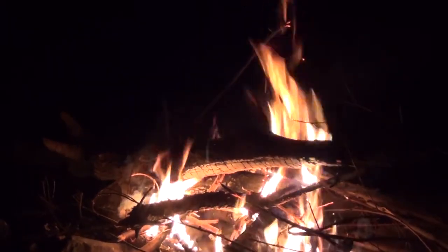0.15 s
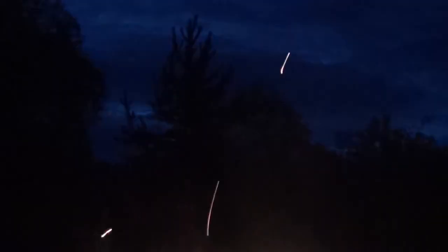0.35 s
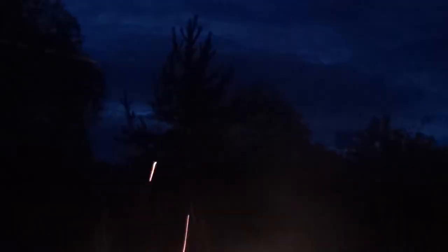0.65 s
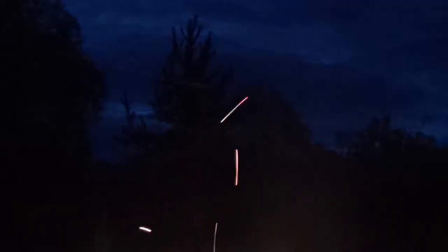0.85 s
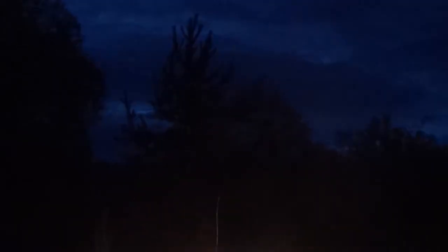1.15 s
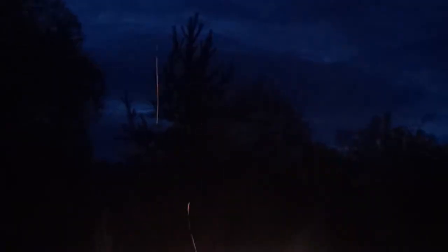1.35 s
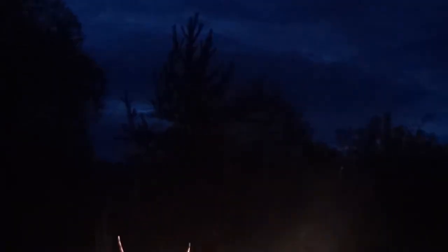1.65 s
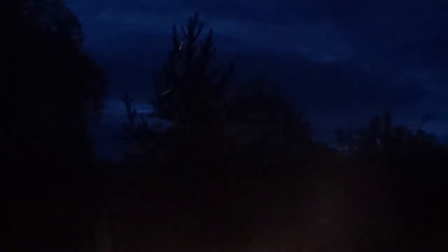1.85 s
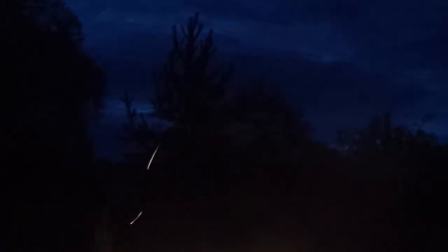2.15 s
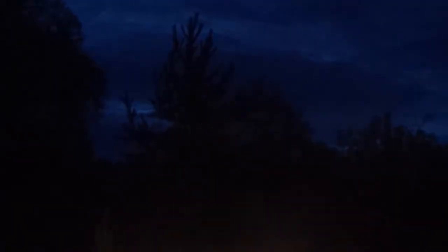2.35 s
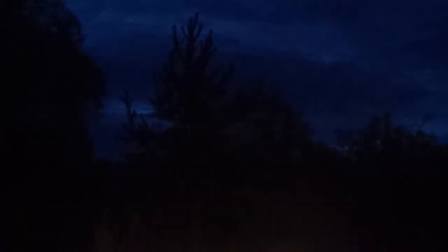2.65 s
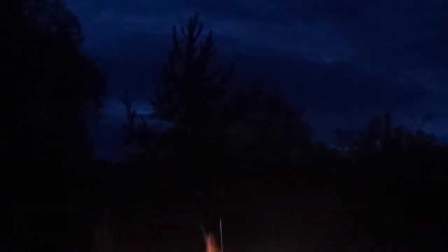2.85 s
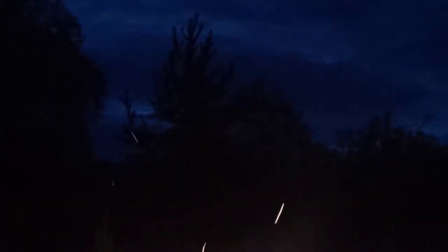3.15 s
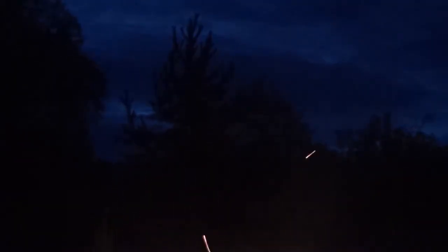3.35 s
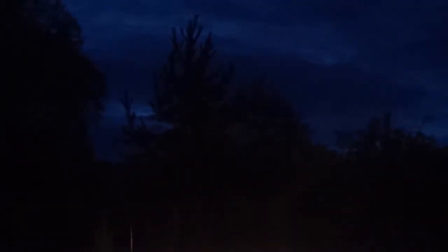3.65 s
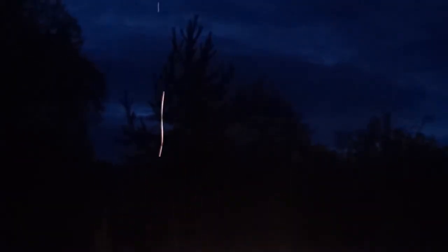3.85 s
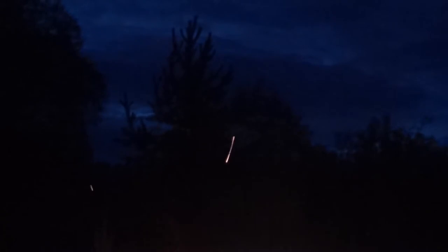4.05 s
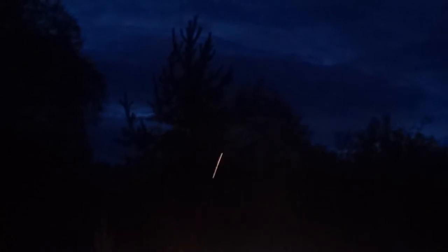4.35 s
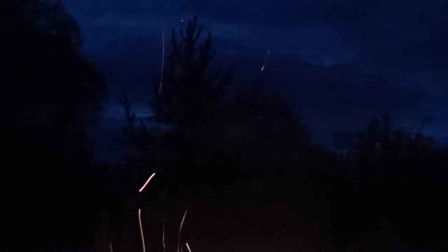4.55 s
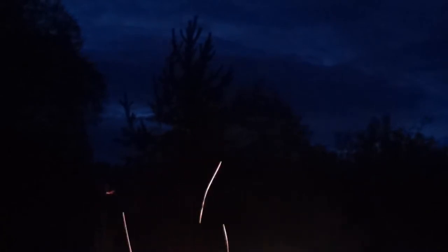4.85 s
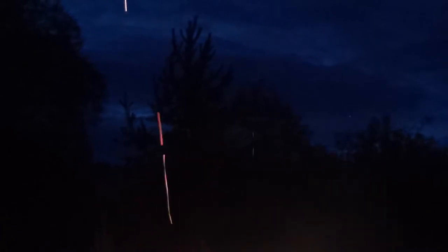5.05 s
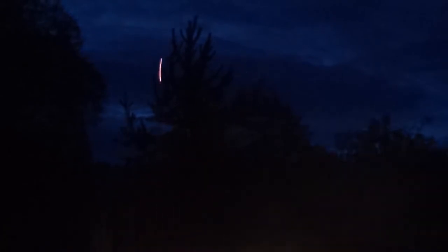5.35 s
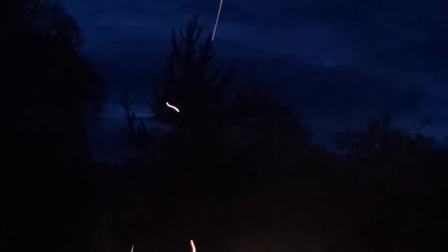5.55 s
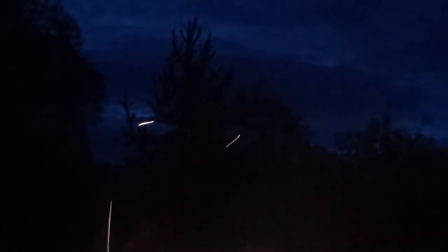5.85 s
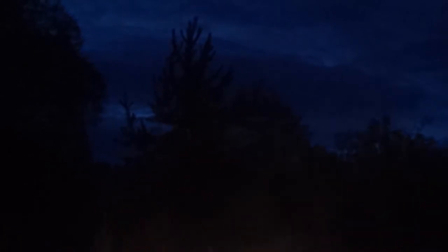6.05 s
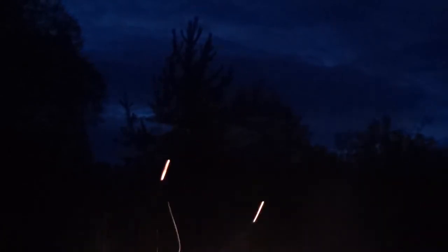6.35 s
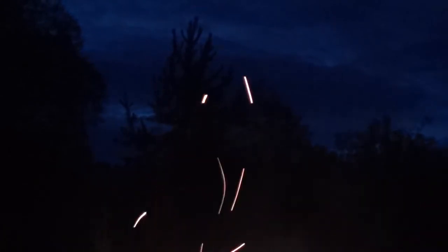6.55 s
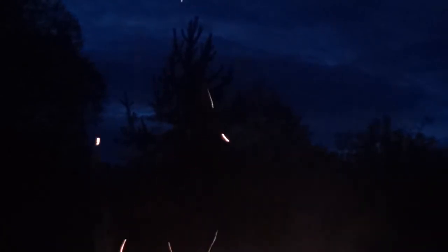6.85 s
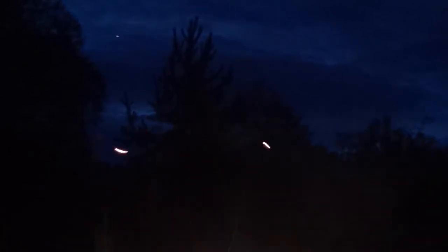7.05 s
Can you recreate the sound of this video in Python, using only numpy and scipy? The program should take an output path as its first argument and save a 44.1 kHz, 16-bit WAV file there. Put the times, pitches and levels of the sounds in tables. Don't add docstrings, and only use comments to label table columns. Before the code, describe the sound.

Outdoors at night, burning branches snap, tick and pop irregularly close by, one pop very loud, over a soft high insect trill.

```python
import sys
import numpy as np
from scipy import signal
from scipy.fft import rfft, irfft, next_fast_len
from scipy.io import wavfile
from scipy.ndimage import uniform_filter1d

SR = 44100
rng = np.random.default_rng(int(sys.argv[2]) if len(sys.argv) > 2 else 0)


def bounce(signal):
    frames = np.transpose(np.atleast_2d(signal))
    limited = np.clip(frames, -1, 1)
    pcm = np.round(limited * 32767).astype(np.int16)
    wavfile.write(sys.argv[1], SR, pcm)


def elevation(decibels):
    levels = np.asarray(decibels, float)
    return 10 ** (levels / 20)


N = 317079


def unit(x):
    return x / np.sqrt(np.mean(x ** 2))


def along(table, hz):
    f, v = np.transpose(table)
    return np.interp(np.log(np.maximum(hz, 1)), np.log(f), v)


def colour(x, table):
    size = next_fast_len(N)
    hz = np.fft.rfftfreq(size, 1 / SR)
    return irfft(rfft(x, size) * elevation(along(table, hz)), size)[..., :N]


def ring(x, modes):
    out = 0
    for hz, width, db in modes:
        b, a = signal.iirpeak(hz, hz / width, SR)
        once = signal.lfilter(b, a, x)
        out = out + elevation(db) * signal.lfilter(b, a, once)
    return out


def walk(rate):
    hold = int(SR / rate)
    steps = np.repeat(rng.standard_normal(N // hold + 1), hold)
    return 1.3 * uniform_filter1d(uniform_filter1d(steps, hold), hold)[:N]


def ticks(rate, scatter_db, most=3.4):
    chance = rng.random((3, N))
    size_db = scatter_db * np.minimum(-np.log(1 - chance[2]), most)
    return (chance[0] < rate / SR) * np.sign(chance[1] - .5) * elevation(size_db)


def pair(mid, other, wide_db, pan_db=0.):
    stereo = mid + elevation(wide_db) * np.array([other, -other])
    return stereo * elevation(np.array([[pan_db], [-pan_db]]) / 2)


def chorus():
    # frequency in Hz, level in dB per Hz.
    chorus_colour = [(4500, -48), (5600, -26.5), (7000, -1.5), (7800, 6), (9800, 2), (10800, -5.5),
                     (12500, -38), (16000, -31)]
    mid, other = unit(colour(rng.standard_normal((2, N)) * elevation(1.64 * walk(5.94)), chorus_colour))
    return elevation(-48.0) * pair(mid, other, -8.0)


def cricket(strokes, wing, sharp, teeth_hz, db, pan_db):
    turn = 2 * np.pi * strokes
    skewed = turn + 0.5 * (np.cos(turn) - 1) + 0.26
    push = np.exp(sharp * (np.cos(skewed) - 1)) * elevation(0.8 * walk(15))
    mid, other = (unit(ring(push * ticks(teeth_hz, scatter_db=0.2), wing)) for _ in range(2))
    return elevation(db) * pair(mid, other, -33.0, pan_db)


def insects(t):
    # time in seconds, strokes the high cricket is ahead of 16 a second,
    # strokes the low cricket is ahead of 15 a second.
    stroke_leads = [(0.0, -0.48, -0.31), (0.51, -0.3, -0.7), (1.03, -0.34, -0.8), (1.54, -0.35, -0.34),
                    (2.05, -0.26, -0.4), (2.57, -0.29, 0.094), (3.08, -0.34, -0.08), (3.6, -0.39, 0.35),
                    (4.11, -0.21, 0.089), (4.62, -0.32, 0.041), (5.14, -0.39, 0.083), (5.65, -0.48, 0.11),
                    (6.16, -0.54, 0.32), (6.68, -0.56, 0.59), (7.19, -0.56, 0.36)]
    # frequency in Hz, width in Hz, level in dB.
    high_wing = [(9740, 1550, 3.5), (10660, 1300, -9), (7080, 480, -0.5), (9000, 1200, -11)]
    low_wing = [(8100, 1400, 1), (8980, 2200, 0.5), (12400, 1300, -20), (6340, 2900, -20)]
    s, high_lead, low_lead = np.transpose(stroke_leads)
    high = 16 * t + np.interp(t, s, high_lead)
    low = 15 * t + np.interp(t, s, low_lead)
    near = cricket(high, high_wing, sharp=1.4, teeth_hz=2500, db=-48.0, pan_db=-1.2)
    near = near + cricket(low, low_wing, sharp=1.6, teeth_hz=1500, db=-48.0, pan_db=-0.82)
    return near + chorus()


def flames():
    # frequency in Hz, level in dB per Hz.
    flame_colour = [(20, -37), (42, -13.5), (86, -4), (150, 1), (240, -3), (300, -13), (370, -22),
                    (700, -19.5), (880, -30), (1500, -34.5), (2200, -34.5), (4500, -43.5)]
    # frequency in Hz, width in Hz, level in dB, left minus right in dB.
    hollows = [(747.6, 59, -4.5, 12.5), (1027, 37, -15.5, -21), (1279, 94, -6, -1.5), (1448, 69, -7, -0.5)]
    # frequency in Hz, left minus right in dB.
    lean = [(50, 3.6), (200, -1), (380, 1.5), (700, 4), (1000, 4), (1300, -0.5)]
    # frequency in Hz, level of the unrelated part in dB.
    spread = [(30, -21), (200, -26.5), (400, -17), (800, -9.5), (1500, -58)]
    out, gusts = 0, walk(11)
    for hz in 25 * 2 ** np.arange(0, 7.1, .5):
        mid, other = ring(rng.standard_normal((2, N)), [(hz, hz / 1.8, 0)])
        flutter = elevation(1.3 * walk(9) + 1.66 * gusts)
        out = out + flutter * pair(mid, other, along(spread, hz), along(lean, hz))
    out = unit(colour(out, flame_colour))
    roar = signal.sosfiltfilt(signal.butter(3, 360, fs=SR, output="sos"), out)
    rush = out - roar
    for hz, width, hollow_db, pan_db in hollows:
        mid, other = unit(ring(rng.standard_normal((2, N)), [(hz, 1.55 * width, 0)]))
        rush = rush + elevation(hollow_db - 19 + 2.9 * walk(3.115)) * pair(mid, other, -36.0, pan_db)
    return roar, elevation(-42.0) * rush


def crackle(activity_db):
    # frequency in Hz, level in dB per Hz.
    crackle_colour = [(900, -35), (1600, -6.5), (3300, -14.5), (4300, -5.7), (5000, -9), (5900, 0.5),
                      (7500, -3.5), (12000, 0), (15700, 0.5)]
    grains = 0
    for hz, width, db in [(3400, 8300, -9), (6280, 2540, -9), (13900, 14300, -6)]:
        smear = rng.standard_normal(128) * np.exp(-np.arange(128) / 12)
        tiny = [np.convolve(ticks(260, scatter_db=4.0), smear)[:N] for _ in range(2)]
        grains = grains + elevation(db) * unit(ring(np.array(tiny), [(hz, width, 0)]))
    sizzle = rng.standard_normal((2, N)) * elevation(2.1 * walk(18))
    mid, other = unit(colour(grains + elevation(-1.5) * sizzle, crackle_colour))
    return pair(mid, other, -53) * elevation(-47.5 + activity_db)


def knocks(ring_ms=1.5, thump_ms=4.6, thump_hz=140):
    # start in seconds, peak in dB, ring frequency in Hz, thump in dB.
    log_knocks = [
        (0.2125, -31.5, 1400, -7),
        (0.257, -29.5, 860, 5),
        (3.493, -33.5, 1360, -15),
    ]
    out, t = np.zeros(N), np.arange(2048) / SR
    ms = t * 1000
    for s, db, hz, thump_db in log_knocks:
        rattle = rng.standard_normal(len(t)) * (ms / ring_ms) * np.exp(-ms / ring_ms)
        wood = ring(rattle, [(hz, 0.6 * hz, 0), (1.66 * hz, 0.56 * hz, -7)])
        swell = (ms / thump_ms) * np.exp(1 - ms / thump_ms)
        thump = elevation(thump_db - 2.0) * np.sin(2 * np.pi * thump_hz * t) * swell
        start = int(s * SR)
        out[start:start + len(t)] += elevation(db) * (0.83 * wood / np.max(np.abs(wood)) + thump)
    return pair(out, np.roll(out, 9), -18)


def bursts(table, crack_ms=0.15, ring_ms=0.95, ring_db=-7, tail_ms=5.1, tail_db=-31,
           echo_ms=1.9, echo_db=-19, wide_db=-23.5, lift_db=2.5):
    # body, 5-7 kHz, edge and air.
    band_edges = [1500, 4800, 7200, 11000, 16000]
    # frequency in Hz, band 0-3 it follows (halves are rounded), level on top in dB.
    burst_colour = [(150, 0.5, -11), (1100, 0, -8.5), (1630, 0, -1.5), (4700, 0, -0.5), (5880, 1, -0.5),
                    (7100, 1, -2), (9860, 2, -5.5), (12300, 3, -3.5), (15750, 3, -3), (17100, 3, -44)]
    s, db, body, edge, air = np.transpose(table)
    size = 1024
    ms = np.arange(size) * 1000 / SR * (np.arange(size) < size * .75)
    dry_gain = elevation(-np.clip(2.5 * air, -7, 10))[:, None]
    ringing = elevation(ring_db) * np.exp(-ms / ring_ms) + elevation(tail_db) * np.exp(-ms / tail_ms)
    shape = np.exp(-ms / crack_ms) + dry_gain * ringing
    mid, other = rng.standard_normal((len(s), 2, size)).transpose(1, 0, 2) * shape * (ms > 0)
    lag = int(echo_ms * SR / 1000)
    mid[:, lag:] += elevation(echo_db) * mid[:, :-lag]
    band_db = db + np.array([body, 0 * db, edge, air])
    per_hz = band_db + 10 * np.log10(SR ** 2 / 2000 / np.diff(band_edges))[:, None]
    knots, band, extra_db = np.transpose(burst_colour)
    knot_db = per_hz[np.rint(band).astype(int)].T + extra_db + lift_db
    hz = np.fft.rfftfreq(size, 1 / SR)
    want_db = np.array([np.interp(hz, knots, row) for row in knot_db])
    have = uniform_filter1d(np.abs(rfft(mid)) ** 2, size=40)
    cepstrum = irfft(np.log(elevation(want_db) / np.sqrt(have)))
    cepstrum[:, 1:size // 2] *= 2
    cepstrum[:, size // 2 + 1:] = 0
    both = np.array([mid + elevation(wide_db) * other, mid - elevation(wide_db) * other])
    burst = irfft(rfft(both) * np.exp(rfft(cepstrum)))
    out = np.zeros((2, N + size))
    for k, start in enumerate((s * SR).astype(int)):
        out[:, start:start + size] += burst[:, k]
    return out[:, :N]


def kind(table, colour_db, scatter_db=2.5):
    scatter = scatter_db * rng.standard_normal((len(table), 3))
    return np.hstack([table, np.array(colour_db) + scatter])


def snaps(gain_db, count=30, stray_db=-43.5, stray_scatter_db=2):
    # start in seconds, 5-7 kHz level in dB.
    twigs = [(.7056, -41), (.865, -37), (.9879, -37.5), (1.012, -43), (1.3137, -36), (1.3602, -36),
             (1.4541, -43), (1.476, -41), (2.6742, -37), (2.8077, -38), (2.8143, -38), (2.8525, -41),
             (3.0534, -41), (3.16, -43), (3.2037, -41), (3.702, -38.5), (3.7233, -40), (4.099, -41),
             (4.3241, -36), (4.349, -40), (4.4646, -39), (4.7606, -42), (4.87, -32), (5.03, -41),
             (5.2491, -42), (5.4715, -38), (5.478, -38), (5.8403, -40), (6.6913, -44), (7.1376, -36)]
    bark = [(.0664, -50), (1.2494, -53), (1.3974, -46), (1.412, -47), (2.2497, -42), (2.3111, -50),
            (2.6951, -45), (2.7492, -46), (2.8274, -47), (2.9201, -44), (3.0039, -40), (3.509, -43),
            (3.5128, -49), (3.6501, -50), (3.9003, -44), (4.4827, -44), (4.7841, -52), (4.8963, -50),
            (5.0778, -44), (5.4321, -49), (5.4489, -42), (5.6004, -49), (5.697, -47), (5.886, -42),
            (5.913, -45), (6.337, -45), (6.7514, -47), (6.766, -53), (6.9718, -50), (7.0664, -43)]
    spits = [(.4323, -31), (.7195, -36), (.9085, -34.5), (1.1879, -35.5), (1.4931, -31.5), (1.6443, -34.5),
             (1.9447, -37), (1.9838, -34.5), (2.0383, -41), (2.0798, -37.5), (2.3523, -35.5),
             (2.547, -36.5), (2.6999, -32.5), (2.7031, -33), (2.769, -35), (2.982, -31), (3.7485, -34),
             (3.9335, -32), (3.9748, -32.5), (4.3147, -35), (4.3356, -37), (4.4734, -38), (4.5377, -36.5),
             (4.7002, -31), (4.7275, -27.5), (5.9935, -35), (6.6075, -35), (6.928, -34), (7.0227, -37),
             (7.0384, -36.5)]
    splits = [(.044, -42), (.159, -33), (.4133, -40), (.596, -42), (1.5532, -36), (1.5646, -37),
              (1.6114, -37), (1.7706, -36.5), (1.8759, -39), (2.2862, -38.5), (2.7192, -37), (3.193, -40),
              (3.2365, -42), (3.5871, -37), (3.6019, -33), (3.9204, -36.5), (4.1463, -36), (4.1717, -37),
              (4.9464, -35), (4.9573, -42), (5.0, -33), (5.114, -36), (5.1368, -30), (5.1706, -39),
              (5.2079, -34), (5.2207, -38), (5.3446, -34.5), (5.4966, -40), (5.5405, -38), (7.0526, -41.5)]
    chance = rng.random((count, 2))
    s = chance[:, 0] * (N - 1) / SR
    level_db = stray_db + stray_scatter_db * (2 * chance[:, 1] - 1)
    strays = np.c_[s, level_db + gain_db[(s * SR).astype(int)]]
    return bursts(np.vstack([
        kind(twigs, (-12.5, 3, 8.5)),
        kind(bark, (-15, 3, 6)),
        kind(spits, (-17.5, -4, -5)),
        kind(splits, (-8, 2, -3)),
        kind(strays, (-14, -3, -3))]))


def sap_pops():
    # body 1.5-5 kHz, edge 7-11 kHz, air 11-16 kHz.
    pop_events = [(0.311, -31, -11, 8, 3), (0.3786, -29.5, -13, 5, 3), (0.3822, -28.5, -20, 1, 0),
                  (0.7129, -28.5, -17.5, -4, -6), (0.9522, -28, -14, 11, 8), (0.966, -27.5, -11, -4, -4),
                  (1.3865, -25, -17, 0, 3), (1.7454, -30.5, -22, -2, 0), (2.1412, -30.5, -14.5, -5, -4),
                  (2.8484, -19.5, -8.5, -1.5, -7), (3.3129, -32.5, -12, -2, 9), (3.5377, -29, -14.5, 0, -4),
                  (3.7925, -34.5, -12, 11, 10), (3.8604, -24, -19, 1, -3), (4.051, -30, -22, -3, 3),
                  (4.239, -29.5, -16.5, 0, -8), (4.3326, -18.5, -17.5, -1.5, -4),
                  (4.6489, -26.5, -15, -4, 0), (4.7361, -28.5, -8.5, -1, 1), (4.9324, -25.5, -7.5, -4, 4),
                  (5.1332, -9.6, -9.5, -3.5, -0.5), (5.8581, -17, -13.5, -1, 6),
                  (5.8837, -24, -12, 7.5, 5.5), (5.9283, -30, -17, -1, 3)]
    return bursts(pop_events)


def camera(t, settle_db=-3, settle_s=0.2, trip_s=5.86, duck_db=-15, duck_s=.028, sag_db=-4, sag_s=1.5):
    since = np.maximum(t - trip_s, 0)
    limiter = duck_db * np.exp(-since / duck_s) + sag_db * np.exp(-since / sag_s)
    return settle_db * np.exp(-t / settle_s) + (t > trip_s) * limiter


def scene():
    # time in seconds, crackle in dB, roar in dB.
    liveliness = [
        (0, 0, -42.5),
        (1.5, -1.7, -44),
        (2.5, -0.9, -43.5),
        (4.2, 0.8, -42),
        (5.25, 1.5, -42.5),
        (5.8, -2.5, -45),
        (6.2, 1.2, -45),
        (7.19, -2, -45.5),
    ]
    t = np.arange(N) / SR
    gain_db = camera(t)
    s, *columns = np.transpose(liveliness)
    activity_db, roar_db = (np.interp(t, s, c) for c in columns)
    roar, rush = flames()
    steady = elevation(gain_db) * (insects(t) + crackle(activity_db) + rush) + elevation(roar_db) * roar
    top = signal.ellip(10, .2, 70, 15850, fs=SR, output="sos")
    return signal.sosfilt(top, steady + snaps(gain_db)) + sap_pops() + knocks()


def low_pass(x):
    return signal.sosfilt(signal.butter(12, 16810, fs=SR, output="sos"), x)


def record(dry):
    top = signal.ellip(10, .2, 90, 16750, fs=SR, output="sos")
    mix = signal.sosfilt(top, np.clip(dry, -1, 1))
    return low_pass(mix)


dry = scene()
out = record(dry)
bounce(out)
```